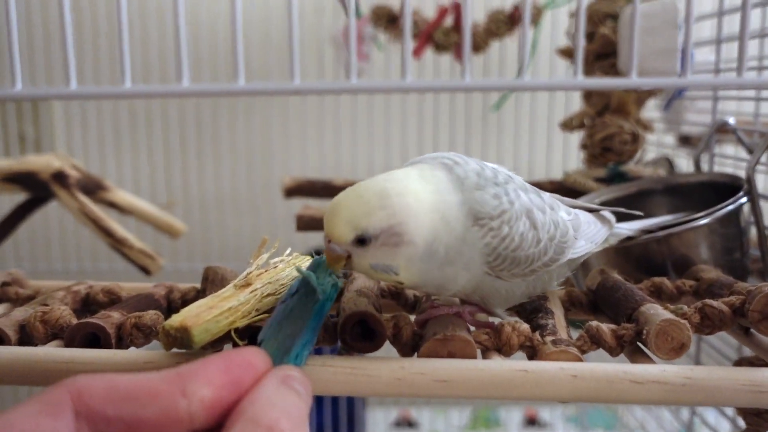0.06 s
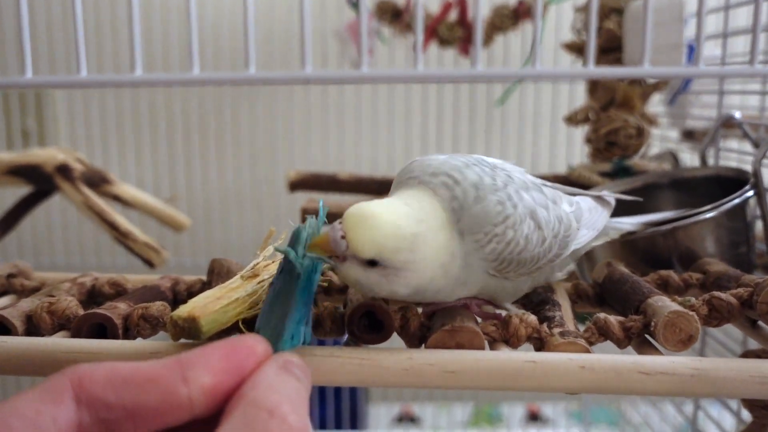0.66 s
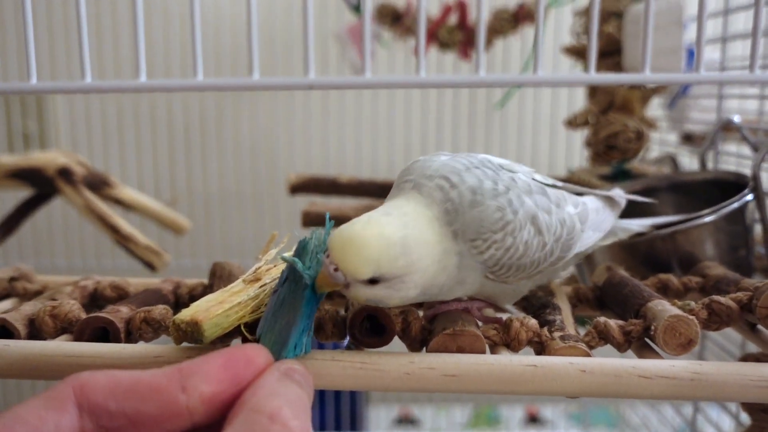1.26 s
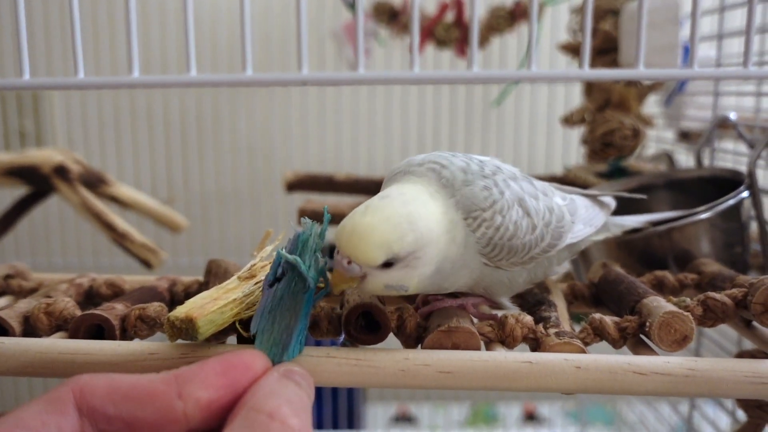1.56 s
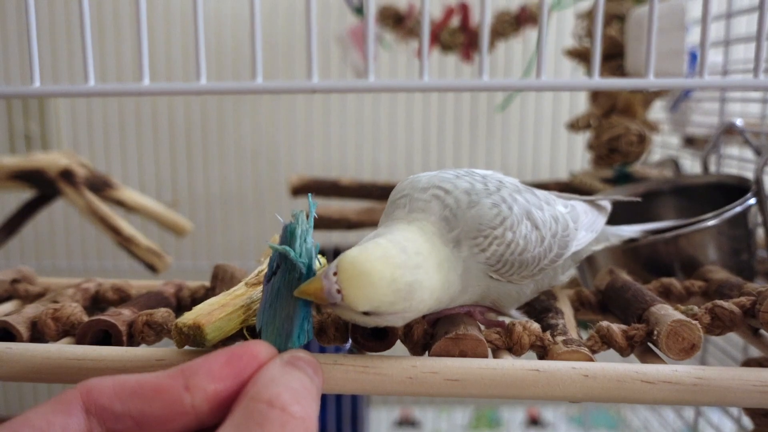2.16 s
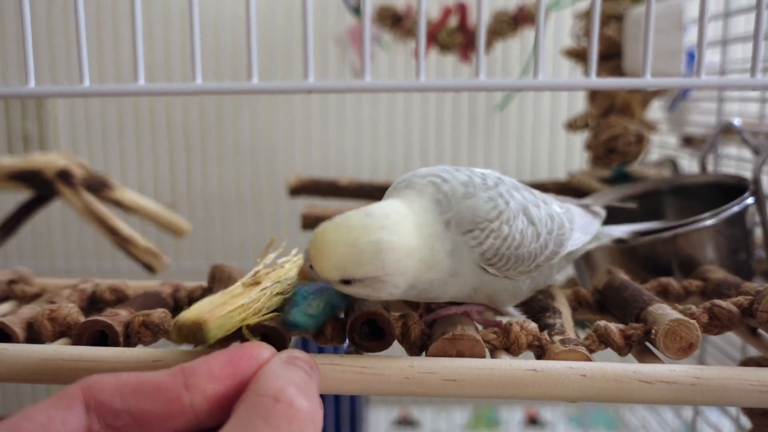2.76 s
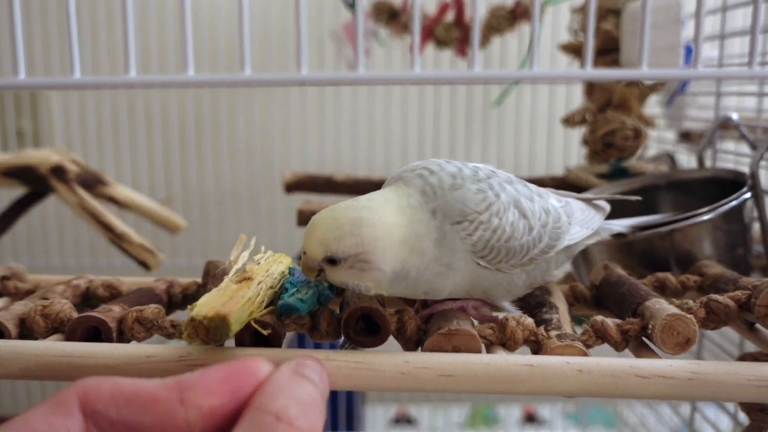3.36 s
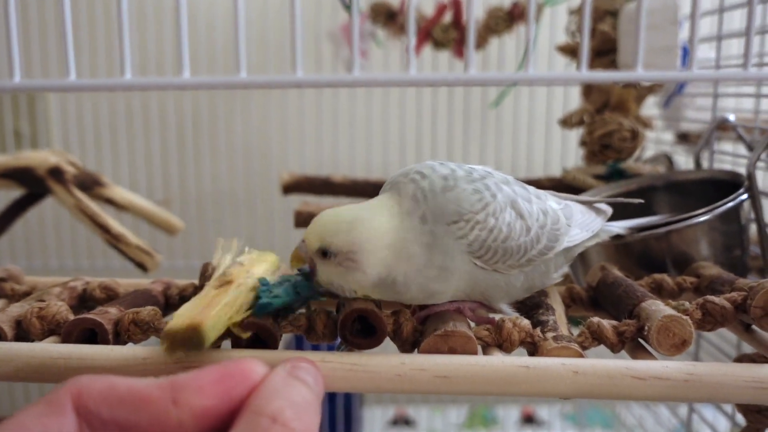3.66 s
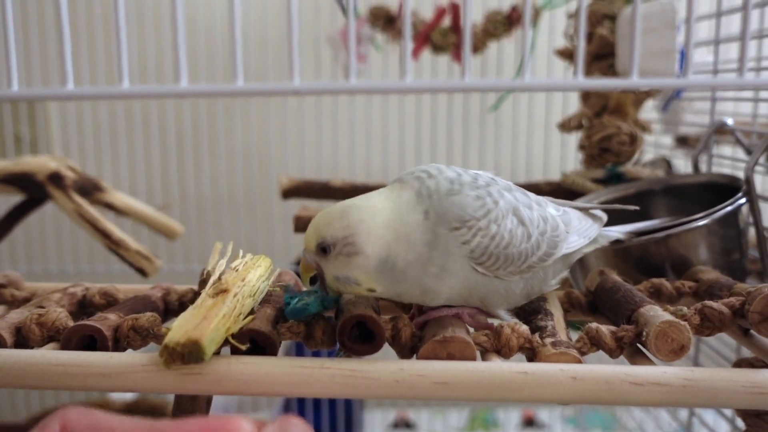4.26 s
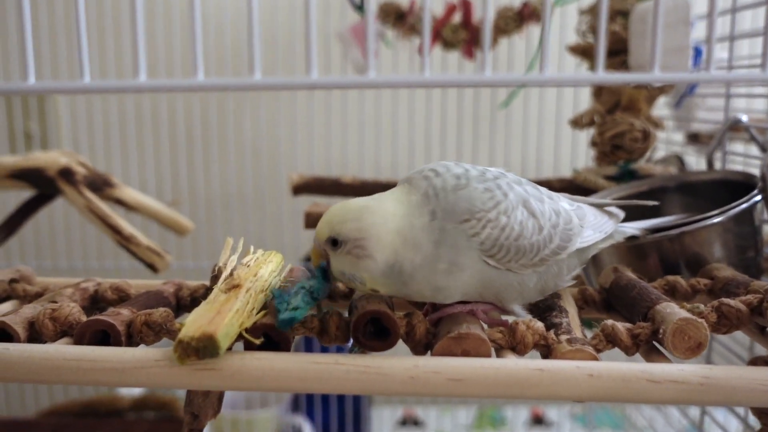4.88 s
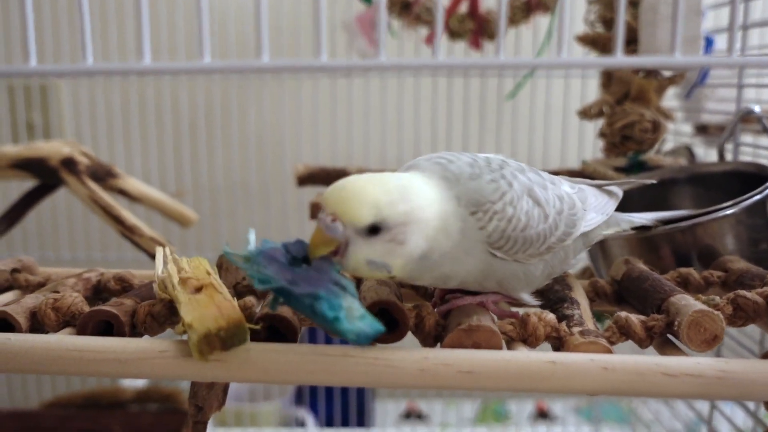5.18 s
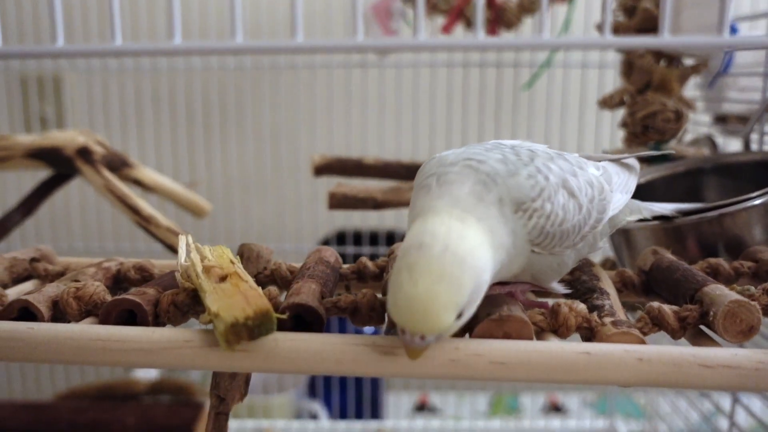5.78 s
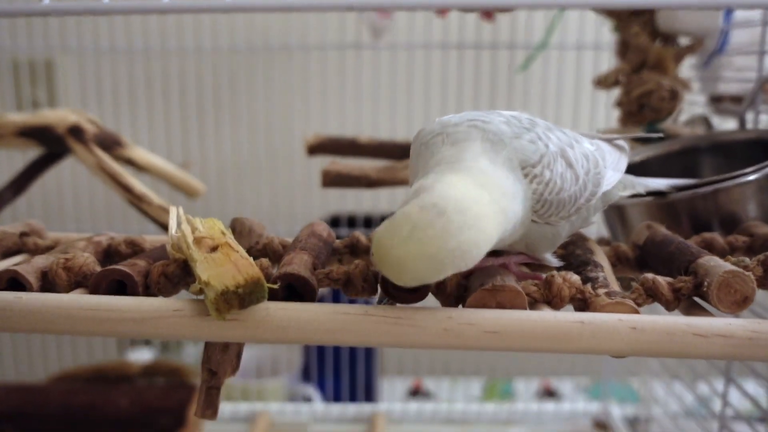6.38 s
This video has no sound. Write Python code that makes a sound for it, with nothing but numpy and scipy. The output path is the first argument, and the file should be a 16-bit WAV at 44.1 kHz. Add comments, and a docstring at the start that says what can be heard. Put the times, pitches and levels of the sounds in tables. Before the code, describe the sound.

A small bird gnaws a dry wood chip with quiet crackles and snaps, then drops it clacking onto the cage floor.

```python
"""A quiet room: a small parrot gnaws a dry wood chip in its cage, close by.
Each bite tears fibres in a fine crackle with sharp snaps; now and then the beak knocks or squeaks.
The bird lets go: the chip hits the cage floor and bounces lightly; the floor and a loose wire ring.
Behind it are room air, a distant fan and a faint whistle."""
import sys
import numpy as np
from scipy import signal
from scipy.fft import rfft, irfft, next_fast_len
from scipy.io import wavfile
from scipy.ndimage import map_coordinates

SR = 44100
rng = np.random.default_rng(int(sys.argv[2]) if len(sys.argv) > 2 else 0)


def pcm_store(signal):
    """Save signal as 16-bit PCM."""
    levels = np.round(np.clip(np.atleast_2d(signal), -1, 1) * 32767)
    wavfile.write(sys.argv[1], SR, levels.astype(np.int16).T)


N = 283563

# (start [s], end [s], strength [dB], scrape [0 = peeling fibres off, 1 = sliding over the chip])
BEAK_BITES = [(0.383, 0.451, -62, 0.586), (0.488, 0.51, -65, 0.45), (0.519, 0.814, -66, 0.82),
              (0.823, 0.896, -65, 0.736), (0.922, 1.307, -66.5, 0.65), (1.31, 1.394, -63.5, 0.695),
              (1.821, 1.945, -68, 0.074), (2.033, 2.061, -65, 0.09), (2.146, 2.171, -60.5, 0.166),
              (2.264, 2.332, -63.5, 0.285), (2.411, 2.509, -53.5, 0.0275), (2.438, 2.497, -55.5, .03),
              (2.52, 2.648, -65.5, 0.556), (2.653, 2.681, -51.5, 0.074), (2.689, 2.75, -54.5, 0.2),
              (2.743, 2.808, -52.5, 0.092), (2.827, 2.842, -58, 0.27), (2.834, 2.897, -66.5, 0.995),
              (2.944, 3.081, -70.5, 0.94), (3.11, 3.181, -63.5, 0.782), (3.643, 3.97, -70.5, 0.693),
              (3.743, 3.898, -63, 0.43), (4.33, 4.532, -79.5, 1), (4.553, 4.664, -66.5, 0.69),
              (4.679, 4.729, -69, 0.9), (4.838, 4.906, -72.5, 0.886), (4.97, 5.012, -63.5, 0.71),
              (5.038, 5.117, -71.5, 0.32)]
# spectra of fibres, chip body and fine fizz: (frequency [Hz], density [dB])
FIBRE_SPECTRUM = [(1000, -54.5), (2800, -17.5), (4400, 0.5), (6200, 5), (7600, 6), (9000, -1),
                  (12000, -8.5), (16000, -3)]
BODY_SPECTRUM = [(200, -36), (600, -25), (1100, 0), (2200, 1), (3500, 0.5), (5000, -6), (9000, -104)]
FIZZ_SPECTRUM = [(6000, -72.5), (9000, -6.5), (10300, -2.5), (11200, 3.5), (12100, -1), (13600, -0.5),
                 (15800, -10)]
def bites(fibre_db=-1, frayed_from_s=2.8, frayed_db=8, flutter_db=3):
    """While the beak presses, the same ruptures sound in the fibres, the chip's body and a fine fizz."""
    t = np.arange(N) / SR
    pressure, sliding = np.zeros((3, N)), np.zeros(N)
    for start, end, db, scrape in BEAK_BITES:
        edge_s = 0.0122 + 0.19 * (end - start)  # beak closing and opening
        gate = np.clip(np.minimum(t - start, end - t) / edge_s + .5, 0, 1)
        body_db = -19.5 + 24 * scrape
        fizz_db = -24.5 + 15.5 * scrape + frayed_db * (start > frayed_from_s)  # a torn edge fizzes more
        pressure += amp(db) * amp([[fibre_db], [body_db], [fizz_db]]) * gate
        sliding = np.maximum(sliding, scrape * (gate > 0))
    # harder bites break more fibres; sliding catches so many that the crackle softens to a rustle
    ruptures_per_s = 1400 + 60000 * pressure[0] + 5000 * sliding
    layers = crackle([FIBRE_SPECTRUM, BODY_SPECTRUM, FIZZ_SPECTRUM], ruptures_per_s)
    grip = amp(flutter_db * wobble(per_s=150))  # catches and gives
    return np.sum(pressure * layers, axis=0) * grip


def crackle(spectra, per_s, spread_db=9.0, rub_gain=0.41):
    """Tiny ruptures of unequal size over the rub of the beak, at rms 1 in each spectrum."""
    breaks = rng.random(N) < per_s / SR
    size = amp(spread_db * np.clip(rng.standard_normal(N), -1.5, 1.5))
    ruptures = breaks * size * rng.choice([-1, 1], N) / np.sqrt(per_s)
    source = unit(ruptures) + rub_gain * rng.standard_normal(N)
    return [coloured(source, spectrum) for spectrum in spectra]


def thin_snaps(hard_bite_db=-51, hard_bite_per_s=150, octaves=.75):
    """Thin fibres break by chance, oftener and louder the harder the beak peels: rows for snaps()."""
    rows = []
    for start, end, db, scrape in BEAK_BITES:
        force_db = db - hard_bite_db
        per_s = hard_bite_per_s * amp(force_db) * np.clip(1 - scrape, 0, 1)
        count = int(per_s * (end - start) + rng.random())
        times_s = start + (end - start) * (np.arange(count) + rng.random(count)) / max(count, 1)
        levels_db = -34 + 0.95 * force_db + 2.5 * rng.standard_normal(count)
        centres_hz = 7200 * 2 ** (0.12 * rng.standard_normal(count))
        rows += zip(times_s, levels_db, centres_hz, np.full(count, octaves))
    return rows


# thickest fibres breaking: (time [s], level [dB], centre [Hz], bandwidth [oct])
THICK_SNAPS = [(0.554, -38.5, 7700, .6), (0.5708, -36.5, 3680, 1.53), (0.6713, -38, 6820, 1.8),
               (0.6795, -38, 5500, 1.7), (0.6939, -30, 7200, 2.1), (0.7148, -39, 7560, 1.03),
               (0.7263, -29, 4000, 1.17), (0.7287, -30.5, 4400, 1.7), (0.7343, -33, 5500, 1.95),
               (0.7383, -28.5, 6000, 1.53), (0.7772, -36.5, 4100, 1.6), (0.8392, -35.5, 5000, 1.07),
               (0.9338, -39, 6580, 0.615), (0.9495, -37.5, 8500, .8), (0.9572, -37.5, 5260, 1.01),
               (1.034, -42, 5500, 1.1), (1.0395, -32, 5180, 1.18), (1.0805, -36, 13000, 0.55),
               (1.3137, -38.5, 7100, 0.93), (1.3602, -35.5, 5570, 1.11), (1.3738, -44.5, 4600, 0.55),
               (1.4796, -28.5, 4590, 0.726), (2.0571, -37.5, 4630, 1.53), (2.1401, -36.5, 5920, 0.55),
               (2.1514, -31, 6250, 0.605), (2.1568, -40, 6760, 0.28), (2.2756, -41.5, 7250, 1.03),
               (2.2815, -33.5, 5430, 1.7), (2.2878, -37.5, 7700, 0.87), (2.2939, -37, 7880, 0.87),
               (2.3244, -41, 8400, 0.67), (2.4261, -24.5, 5120, 0.86), (2.4388, -23.5, 7000, 1.3),
               (2.4402, -30, 5000, 0.99), (2.4453, -27.5, 6000, 1.08), (2.4552, -24.5, 7520, 0.62),
               (2.4575, -35, 4460, 0.43), (2.4592, -31.5, 6300, 1.33), (2.4706, -20.5, 7400, 1.33),
               (2.4852, -31.5, 6700, 0.65), (2.5075, -34, 6760, 0.35), (2.6605, -29, 6160, 0.34),
               (2.6639, -31.5, 6170, 0.34), (2.6734, -30, 7200, 1.2), (2.6787, -30, 6560, 0.32),
               (2.6896, -31.5, 7390, 0.58), (2.697, -34.5, 7100, 0.67), (2.7012, -38, 7100, 0.47),
               (2.7195, -32.5, 7590, 0.88), (2.7376, -30.5, 7400, 0.76), (2.748, -28, 7440, 0.33),
               (2.7551, -25, 7200, 1.08), (2.763, -26, 7700, 0.82), (2.7706, -29, 7100, 0.76),
               (2.7821, -18, 7380, 1.02), (2.7878, -26, 7400, 0.68), (2.7949, -32.5, 7700, .85),
               (2.7976, -26.5, 8000, 0.94), (2.804, -25, 7070, 0.88), (2.8064, -33, 7090, 0.75),
               (2.8269, -20, 7980, 1.31), (2.8291, -28, 6400, 0.41), (2.834, -35, 7460, 2.2),
               (3.1321, -37, 10500, 0.91), (3.8605, -40.5, 10000, 1), (3.8643, -32, 10540, 1.04),
               (4.616, -38.5, 11000, 0.48)]
def snaps(fibres, tear_s=.0003, skirt_db=-25, skirt_hz=7500, splinter_db=-14, splinters_within_s=.0025):
    """A fibre tears in under a millisecond, cut more steeply below its centre; three splinters follow."""
    out, t = np.zeros(N), np.arange(SR // 500) / SR
    skirt = lambda hz: amp(skirt_db) * hz ** 2 / (hz ** 2 + skirt_hz ** 2)
    for s, db, centre_hz, octaves in fibres:
        band = lambda hz: hump(hz, centre_hz, octaves * np.where(hz < centre_hz, 0.857, 1.09))
        click = pulse(lambda hz: band(hz) + skirt(hz))
        tear = (t == 0) + .13 * rng.standard_normal(len(t)) * np.exp(-t / tear_s)
        snap = np.convolve(click, tear)
        snap *= np.linalg.norm(click) / np.linalg.norm(snap)
        add(out, s, amp(db) * snap)
        for delay, size in rng.random((3, 2)):
            add(out, s + splinters_within_s * delay, amp(db + splinter_db) * (2 * size - 1) * snap)
    return out


# crushed fibre bundles: (time [s], length [s], level [dB], centre [Hz], bandwidth [oct])
BUNDLE_CRUNCHES = [(0.5729, 0.00196, -49.5, 3500, 1.35), (0.6529, 0.00378, -49, 3400, 1.92),
                   (0.6697, 0.0019, -45, 6000, 1.86), (0.7319, 0.00375, -44, 6000, 3.3),
                   (0.737, 0.0076, -54.5, 8000, 2.5), (0.847, 0.00484, -58, 4500, 1.55),
                   (2.4383, 0.00403, -45, 6200, 1.11), (2.455, 0.0064, -48, 6500, 0.93),
                   (2.8322, 0.00313, -37, 6170, 1.28), (3.1276, 0.0076, -56, 2500, 0.91),
                   (3.128, 0.0068, -53.5, 11500, 0.58), (3.155, 0.00302, -54, 3200, 2.1),
                   (3.7632, 0.00354, -52.5, 3600, 1.08)]
def crunches(spread_db=3, skirt_db=-24):
    """A bundle gives way within milliseconds: a packed run of unequal ruptures."""
    out = np.zeros(N)
    for s, length_s, db, centre_hz, octaves in BUNDLE_CRUNCHES:
        n = int(length_s * SR)
        ruptures = rng.choice([-1, 1], n) * amp(spread_db * rng.standard_normal(n))
        ruptures *= signal.windows.tukey(n, .7)
        crunch = filtered(ruptures, lambda hz: hump(hz, centre_hz, octaves) + amp(skirt_db))
        add(out, s, amp(db) * unit(crunch))
    return highpass(out, hz=600)


# beak tapping the chip: (time [s], level [dB], pitch [Hz])
BEAK_TAPS = [(0.5708, -37.5, 2195), (0.6557, -39.5, 1190), (0.729, -37, 2860), (0.735, -37, 2240),
             (0.826, -45, 2490), (1.4798, -50.5, 1940), (2.834, -38.5, 1054), (3.1309, -38, 2270),
             (3.1571, -37.5, 1920), (3.765, -38.5, 1800)]
def knocks(fibres, t60_s=0.00495, upper_ratio=1.597, upper_db=-9, splinter_db=-48, splinter_hz=7880):
    """The held wood answers a tap, and a thin splinter a snap, with two heavily damped modes."""
    out, t = np.zeros(N), np.arange(SR // 20) / SR
    tip_from_s, tip_to_s = .54, 1.06  # the splinter rings while the beak works the tip
    splinter = [(s, splinter_db, splinter_hz) for s, *_ in fibres if tip_from_s < s < tip_to_s]
    for s, db, pitch_hz in BEAK_TAPS + splinter:
        phase = 2 * np.pi * pitch_hz * t
        modes = np.sin(phase) - amp(upper_db) * np.sin(upper_ratio * phase)
        add(out, s, amp(db - 60 * t / t60_s) * modes)
    return highpass(out, hz=800)


# beak slipping on wood: (time [s], length [s], pitch [Hz], half-width [Hz], rms level [dB])
BEAK_SLIPS = [(0.433, 0.0078, 11280, 600, -59), (0.636, 0.0066, 11300, 600, -61),
              (1.396, 0.0204, 8610, 130, -64.5), (3.073, 0.0042, 8970, 600, -62),
              (3.083, 0.0048, 8900, 900, -60), (3.592, 0.0128, 10190, 300, -69),
              (3.78, 0.131, 11070, 400, -65.5), (3.817, 0.0265, 7150, 199, -64.5),
              (5.055, 0.0084, 7900, 300, -59), (5.055, 0.0083, 9320, 400, -65)]
def squeaks(catch_db=4, catch_per_s=500):
    """Brief stick-slip: a hoarse band of friction that catches and gives."""
    out = np.zeros(N)
    for s, length_s, pitch_hz, half_hz, db in BEAK_SLIPS:
        n = int(length_s * SR)
        friction = resonance(rng.standard_normal(n), pitch_hz, half_hz)
        catch = amp(catch_db * wobble(catch_per_s)[:n])
        add(out, s, amp(db) * unit(friction * catch * signal.windows.tukey(n, .5)))
    return out


# chip hitting the floor, then bouncing:
# (time [s], level [dB], centre [Hz], bandwidth [oct], relative ring [dB], clack t60 [s])
CHIP_CONTACTS = [(5.8032, -24.5, 2130, 3.76, 3, 0.0888), (5.872, -33, 1375, 0.102, 7, 0.118),
                 (5.9945, -51.5, 1500, 1.46, -12, 0.037), (6.0145, -46.5, 2210, 0.88, -15, 0.034),
                 (6.0705, -49.5, 4000, 3.8, -19, 0.0335), (6.085, -51.5, 2400, 1.67, -8.5, 0.026)]
# clack of a contact: (frequency [Hz], density [dB])
CLACK_SPECTRUM = [(40, -32.5), (160, -27.5), (280, -18.5), (420, -16.5), (650, -4.5), (820, 3.5), (940, -8),
                  (1100, -0.5), (1500, -1.5), (2600, -3.5), (4000, -4), (6300, -4.5), (8000, -13.5),
                  (11000, -16), (15000, -28.5)]
# cage floor modes: (frequency [Hz], level [dB], t60 [s])
FLOOR_MODES = [(282, -25, .27), (337, -25, .28), (787, -13, .2), (816, -16, .42), (832, -4.5, .23),
               (888, -21, .55), (1103, -24, .3), (1227, -28, .63), (1263, -15, .2), (1302, -25, .55),
               (1358, -17, .38), (1483, -14, .36), (1580, -12, .25), (1789, -10, .17), (1917, -10, .12),
               (1948, -14, .24), (2136, -16, .2), (2178, -12, .22), (2258, -18, .3), (2512, -10, .17),
               (2546, -6.5, .14), (2590, -7, .07), (2670, -7, .07), (2744, -11, .13), (3120, -20, .22),
               (3335, -13, .15), (3558, -20, .19), (3751, -4, .11), (3779, -13, .23), (4064, -22, .16),
               (4540, -19, .11), (5155, -14, .13), (5960, -16, .08), (6600, -23, .12)]
def landing(ring_db=-2.5, treble_t60_ratio=0.64, split_hz=4500, rise_cycles=2.04, tick_db=10, tick_hz=3100):
    """Each contact gives a hard tick and a dense clack that dulls as it dies; the floor rings on."""
    clacks, rings, t = np.zeros(N), np.zeros(N), np.arange(SR) / SR
    attack = 1 - np.exp(-t / .0005)  # the clack swells in over half a millisecond
    for s, db, centre_hz, octaves, ring_rel_db, t60_s in CHIP_CONTACTS:
        contact = lambda hz: hump(hz, centre_hz, octaves)  # the point struck selects the modes
        dense = filtered(coloured(rng.standard_normal(SR), CLACK_SPECTRUM), contact)
        low = filtered(dense, lambda hz: 1 / (1 + (hz / split_hz) ** 4))
        decay_db = -60 * t / t60_s
        clack = low * amp(decay_db) + (dense - low) * amp(decay_db / treble_t60_ratio)
        add(clacks, s, amp(db) * attack * clack)
        tick = pulse(lambda hz: hump(hz, tick_hz, 1.1) * hump(hz, centre_hz, max(octaves, 1)))
        add(clacks, s, amp(db + tick_db) * contact(tick_hz) * tick)
        for mode_hz, mode_db, mode_t60_s in FLOOR_MODES:
            decay = amp(db + ring_db + ring_rel_db + mode_db - 60 * t / mode_t60_s)
            rise = 1 - np.exp(-t * mode_hz / rise_cycles)
            tone = np.sin(2 * np.pi * (mode_hz * t + rng.random()))
            add(rings, s, contact(mode_hz) * decay * rise * tone)
    return highpass(clacks, hz=210), highpass(rings, hz=210)


# wire swelling as the chip bounces, then stilled: (time [s], level [dB])
WIRE_ENVELOPE = [(5.8, -120), (5.81, -48), (5.89, -47), (5.95, -54), (6.007, -52), (6.015, -41),
                 (6.025, -53), (6.1, -59), (6.22, -57.5), (6.245, -73), (6.43, -90)]
def wire(modes_hz=(1412, 1386), twin_db=-5, flutter_db=3, flutter_per_s=80):
    """A shaken loose cage wire rings unevenly; its two close modes beat."""
    t = np.arange(N) / SR
    tone, twin = np.sin(2 * np.pi * (np.outer(modes_hz, t) + rng.random((2, 1))))
    flutter = amp(flutter_db * wobble(flutter_per_s))
    return envelope(WIRE_ENVELOPE) * flutter * (tone + amp(twin_db) * twin)


# room decay: (frequency [Hz], t60 [s])
ROOM_T60 = [(200, 1.05), (800, 1.107), (1400, 1.52), (2400, 0.66), (3500, 0.388), (7000, 0.374),
            (14000, 0.446)]
def room(x, wet_db, near_db, near_rise_s=0.0044, near_t60_s=0.029, tail_rise_s=0.0146):
    """Perch and cage scatter the sound at once; the room's tail builds up later."""
    n = int(.8 * SR)
    t = np.arange(n) / SR
    hz, frames_s, spectra = signal.stft(stereo_noise(n), SR, nperseg=256)
    decay = amp(-60 * frames_s / along(ROOM_T60, hz)[:, None])
    tail = signal.istft(spectra * decay, SR, nperseg=256)[1][:, :n]
    tail *= 1 - np.exp(-t / tail_rise_s)
    near = stereo_noise(n) * amp(-60 * t / near_t60_s) * np.minimum(t / near_rise_s, 1)
    response = amp(wet_db) * tail / np.linalg.norm(tail[0])
    response += amp(near_db) * near / np.linalg.norm(near[0])
    return x + signal.fftconvolve(x[None], response, axes=1)[:, :N]


# room air: (frequency [Hz], density [dB])
AIR_SPECTRUM = [(15, -72.5), (25, -39), (116, -30), (141, -22), (333, -14), (620, -11.5), (672, -1.5),
                (905, -8.5), (1590, -5), (2090, -3), (2390, -7), (3220, -8.5), (3490, -7), (5090, -13.5),
                (15800, -21.5)]
def air(rms_db=-62):
    """Steady diffuse noise."""
    return amp(rms_db) * coloured(stereo_noise(N), AIR_SPECTRUM)


# fan resonances: (centre [Hz], width [Hz], level [dB])
FAN_RESONANCES = [(145.94, 6.5, -104), (718, 65.5, -75), (1640.3, 75, -76), (2093, 98, -83.5),
                  (4014, 40, -82.5), (4428, 35, -81), (4767, 32, -83)]
# swells of the hum: (time [s], length [s], centre [Hz], width [Hz], level [dB])
FAN_SWELLS = [(1.324, 0.27, 1800, 64, -73), (3, 0.143, 1640, 110, -62.5), (4.9, 0.418, 1800, 90, -66),
              (5.4, 0.64, 2170, 50, -76.5), (4.4, .9, 1760, 40, -75)]
def fan(waver_db=2, waver_per_s=4, drift_hz=15, drift_per_s=8, half_width_ratio=.67):
    """A distant fan hums in resonances that waver in level and pitch; narrow bands swell at times."""
    out = np.zeros((2, N))
    for centre_hz, width_hz, db in FAN_RESONANCES:
        gain = amp(db + waver_db * wobble(waver_per_s))
        band = noise_band(centre_hz, half_width_ratio * width_hz)
        analytic = signal.hilbert(band, next_fast_len(N))[:, :N]
        drift_phase = 2 * np.pi * np.cumsum(drift_hz * wobble(drift_per_s)) / SR
        out += gain * np.real(analytic * np.exp(1j * drift_phase))
    for s, length_s, centre_hz, width_hz, db in FAN_SWELLS:
        swell = np.zeros(N)
        add(swell, s, signal.windows.tukey(int(length_s * SR), .5))
        out += amp(db) * swell * noise_band(centre_hz, half_width_ratio * width_hz)
    return out


# whistle loudness: (time [s], rms level [dB])
WHISTLE_ENVELOPE = [(0, -78), (1.5, -76), (1.75, -75.5), (2.05, -74.5), (2.3, -72), (3.9, -79.5),
                    (4.1, -70), (4.35, -76), (6.4, -81.5)]
def whistle(pitch_hz=3455, half_hz=24):
    """A faint whistle comes and goes."""
    return envelope(WHISTLE_ENVELOPE) * noise_band(pitch_hz, half_hz)


# diffuse field: (frequency [Hz], left-right coherence [0-1])
COHERENCE = [(60, 0.78), (250, 0.55), (600, 0.738), (2000, 0.585), (6000, 0.642), (15000, 0.863)]
def stereo_noise(n):
    """Diffuse white noise at two nearby points."""
    angle = lambda hz: np.arccos(np.clip(along(COHERENCE, hz), 0, .999)) / 2
    weights = lambda hz: np.array([np.cos(angle(hz)), np.sin(angle(hz))])
    mid, side = filtered(rng.standard_normal((2, n)), weights)
    return np.array([mid + side, mid - side])


def noise_band(centre_hz, half_hz):
    """Narrow diffuse noise at rms 1."""
    return unit(resonance(stereo_noise(N), centre_hz, half_hz))


def resonance(x, centre_hz, half_hz):
    """Band-pass with half gain at half_hz off centre."""
    return filtered(x, lambda hz: 1 / (1 + ((hz - centre_hz) / half_hz) ** 2))


def highpass(x, hz):
    """Small, thin things radiate little bass."""
    return signal.sosfilt(signal.butter(2, hz, "high", fs=SR, output="sos"), x)


def filtered(x, response):
    """Apply a gain given as a function of frequency."""
    n = x.shape[-1]
    padded = next_fast_len(n + 8192)
    return irfft(rfft(x, padded) * response(np.fft.rfftfreq(padded, 1 / SR)), padded)[..., :n]


def coloured(x, spectrum):
    """x shaped by a spectrum, at rms 1."""
    return unit(filtered(x, lambda hz: amp(along(spectrum, hz))))


def pulse(response, size=256):
    """Minimum-phase pulse with a given spectrum, envelope peak 1."""
    cepstrum = irfft(np.log(response(np.fft.rfftfreq(size, 1 / SR)) + 1e-6))
    cepstrum[1:size // 2] *= 2
    cepstrum[size // 2 + 1:] = 0
    wave = irfft(np.exp(rfft(cepstrum)))
    return wave / np.abs(signal.hilbert(wave)).max()


def hump(hz, centre_hz, octaves):
    """Bell-shaped gain over log frequency."""
    return np.exp(-(np.log2((hz + 1) / centre_hz) / octaves) ** 2)


def along(points, hz):
    """Interpolate (frequency [Hz], value) points over log frequency."""
    points_hz, values = np.transpose(points)
    return np.interp(np.log(hz + 1), np.log(points_hz + 1), values)


def envelope(points):
    """Gain through (time [s], level [dB]) points."""
    return amp(np.interp(np.arange(N) / SR, *np.transpose(points)))


def wobble(per_s):
    """Smooth random curve with per_s knots a second."""
    return map_coordinates(rng.standard_normal(int(N * per_s / SR) + 4), [np.arange(N) * per_s / SR])


def add(track, s, sound):
    """Mix a sound into a track at time s."""
    part = track[round(s * SR):][:len(sound)]
    part += sound[:len(part)]


def amp(db):
    return 10 ** (np.asarray(db) / 20)


def unit(x):
    return x / np.sqrt(np.mean(x ** 2) + 1e-20)


def scene():
    """Gnawing and clacks stir cage and room, slightly to the right, over the background."""
    fibres = THICK_SNAPS + thin_snaps()
    gnawing = bites() + snaps(fibres) + crunches() + knocks(fibres) + squeaks()
    beak = room(gnawing, wet_db=-9.5, near_db=-13)
    clacks, rings = landing()
    fall = room(clacks, wet_db=-9, near_db=-9) + rings + wire()
    balance = amp([[-.15], [.15]])
    return (beak + fall) * balance + air() + fan() + whistle()


def record(dry):
    """Brick-wall low-pass."""
    return filtered(dry, lambda hz: hz < 15900)


dry = scene()
out = record(dry)
pcm_store(out)
```